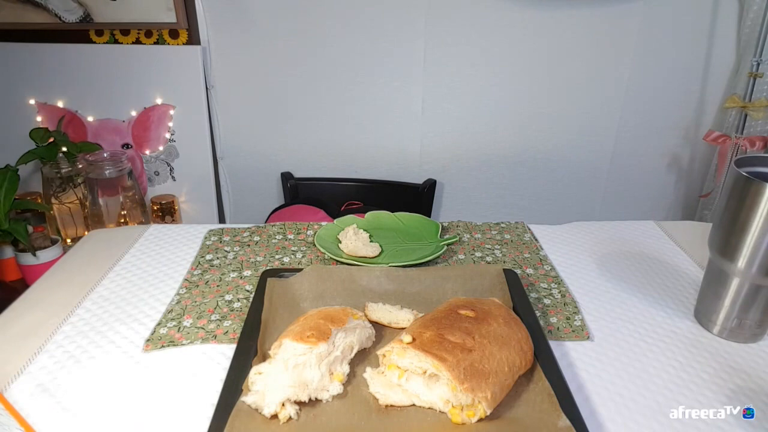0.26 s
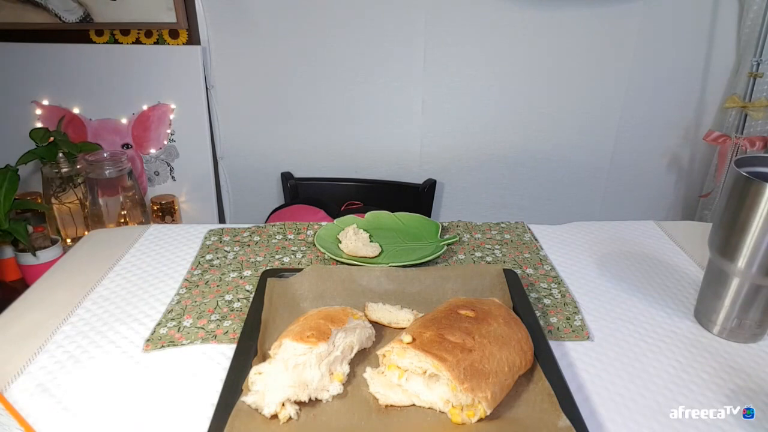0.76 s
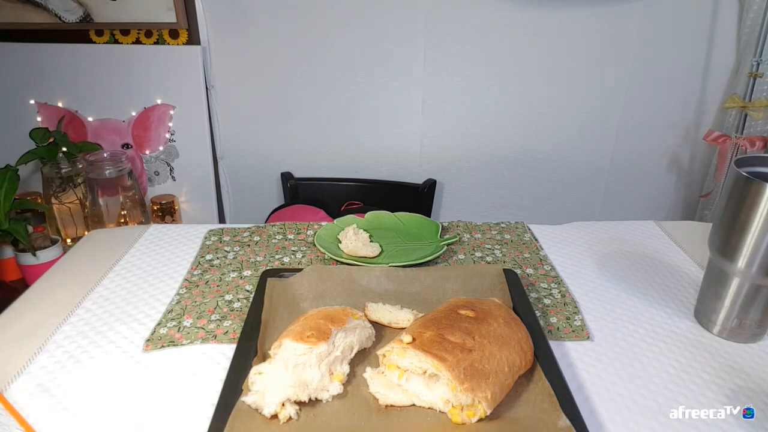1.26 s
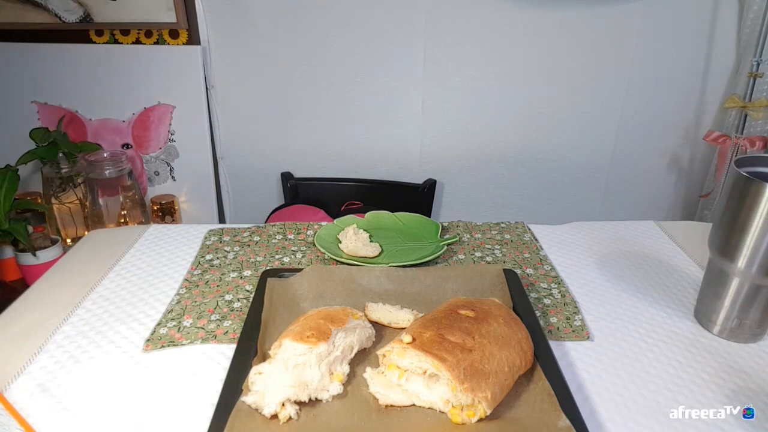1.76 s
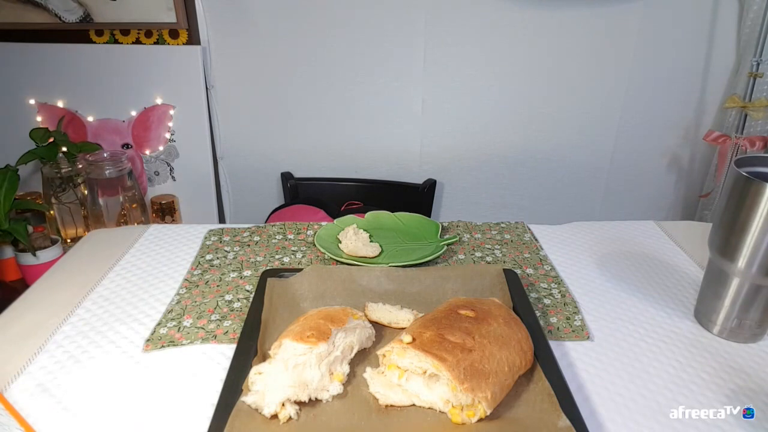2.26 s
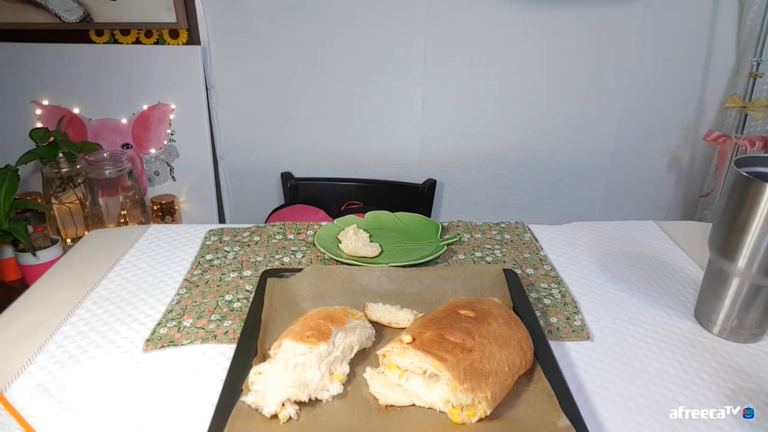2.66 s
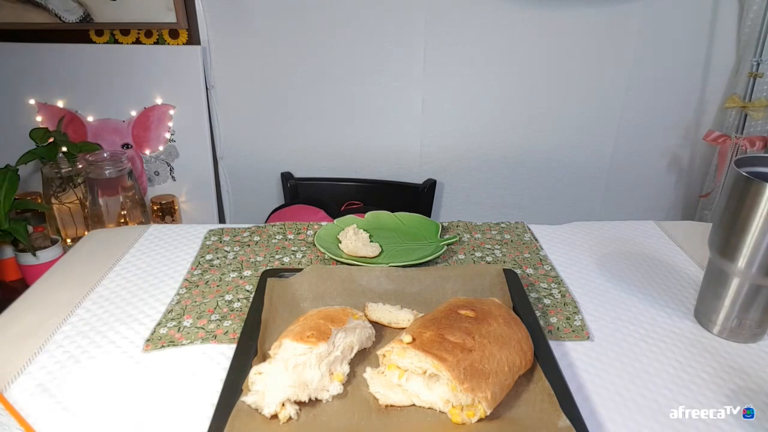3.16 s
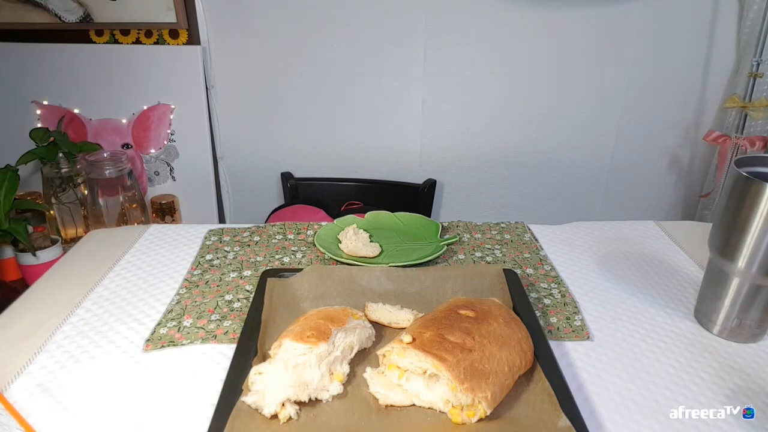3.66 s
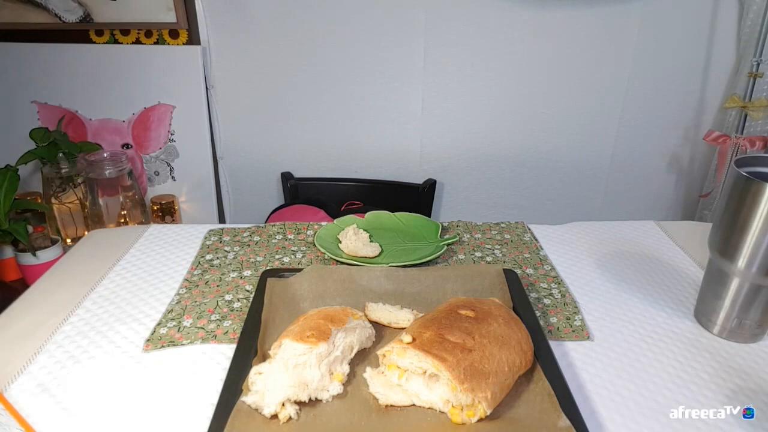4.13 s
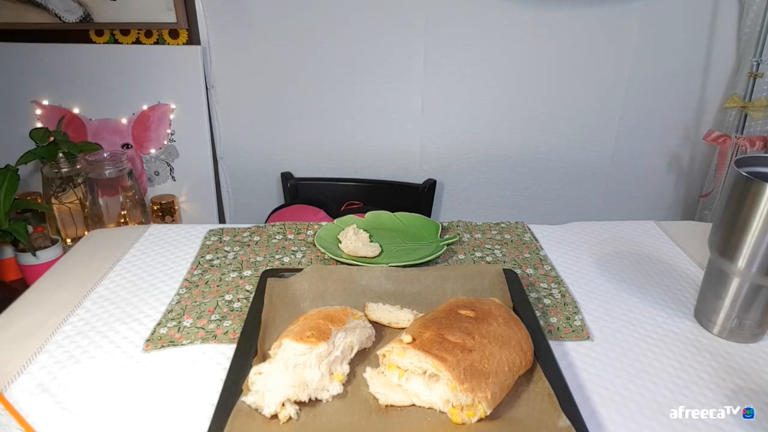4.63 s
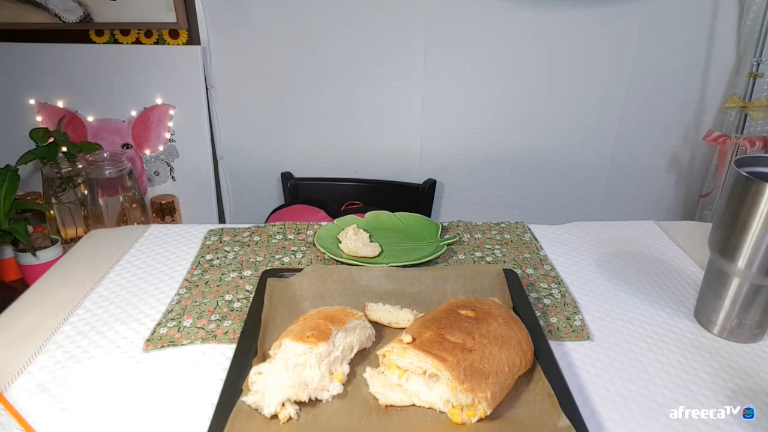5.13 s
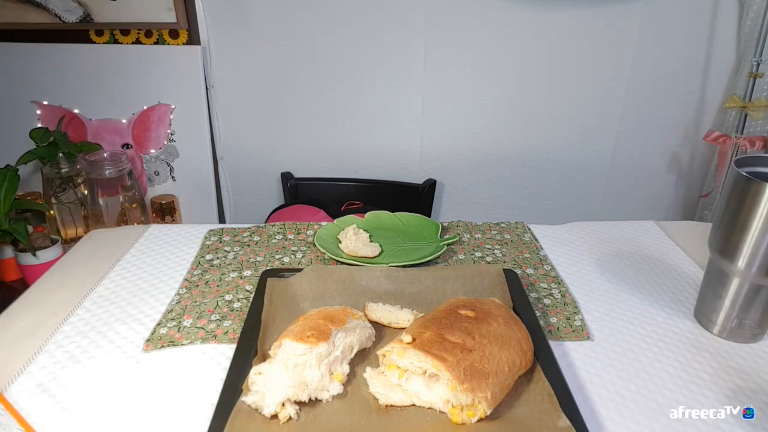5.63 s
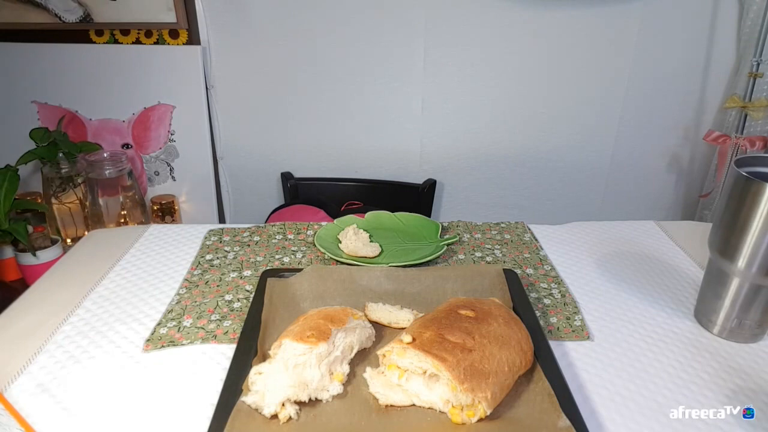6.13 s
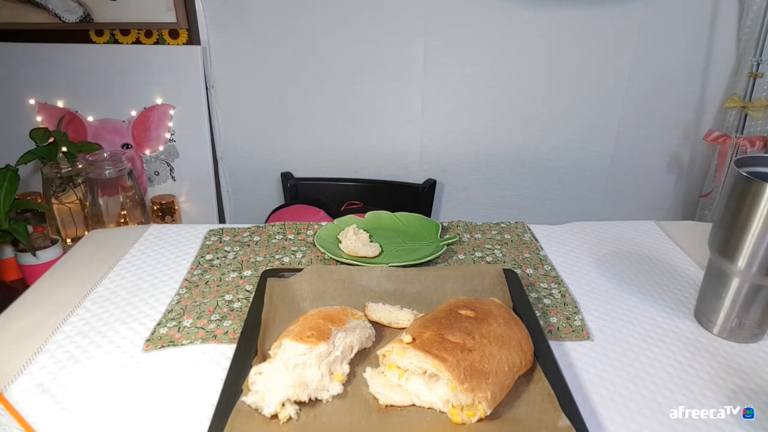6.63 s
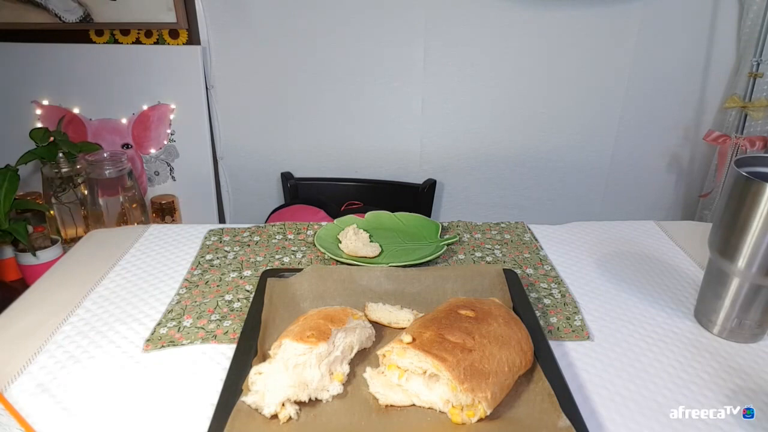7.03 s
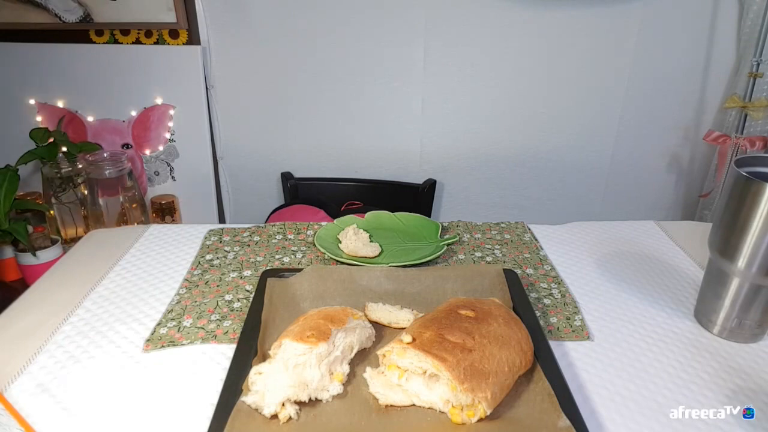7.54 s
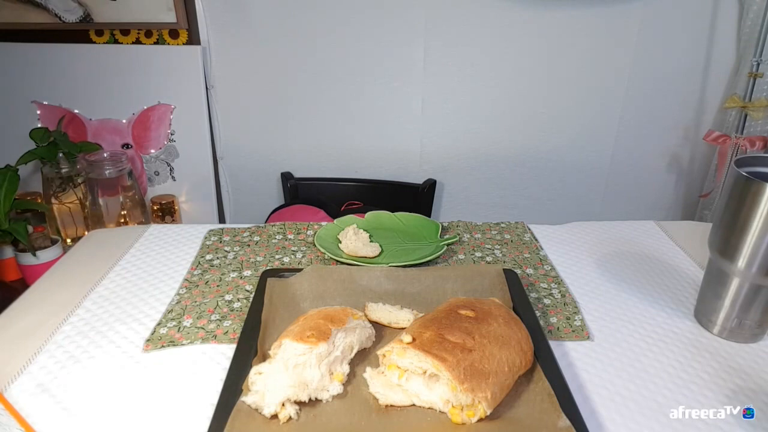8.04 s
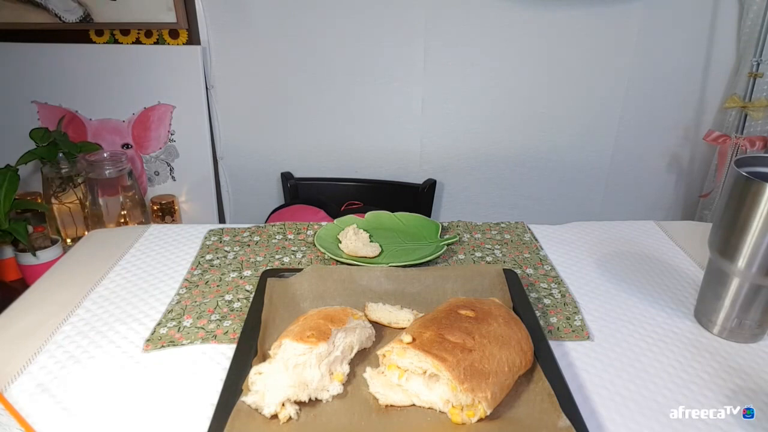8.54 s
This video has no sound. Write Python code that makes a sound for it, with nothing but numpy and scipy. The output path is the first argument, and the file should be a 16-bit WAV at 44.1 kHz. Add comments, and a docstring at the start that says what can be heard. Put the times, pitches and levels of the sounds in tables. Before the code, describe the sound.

In a small hard-walled kitchen, someone out of sight searches a refrigerator a few metres from the microphone. Containers knock and thump on plastic shelves in irregular clusters, each with a short hollow boom and room echo. Glass jars clink brightly around three, four and eight seconds. Quiet room air and a very faint electrical hum fill the gaps. Nobody speaks.

```python
"""Containers knock on the plastic shelves of a refrigerator being searched in a small, hard-walled kitchen.
Each knock is noise shaped by shelf, container and room resonances, and makes the cabinet's air boom.
Glass jars clink: decaying sine modes with a bright, brief splash of shaped noise.
The search is a few metres away, so nearly all of it arrives by way of the walls.
Filtered noise makes the steady room air beneath, and sine tones a faint mains hum."""
import sys
import numpy as np
from scipy import signal
from scipy.fft import rfft, irfft, next_fast_len
from scipy.io import wavfile
from scipy.ndimage import uniform_filter1d, map_coordinates

SR = 44100
rng = np.random.default_rng(int(sys.argv[2]) if len(sys.argv) > 2 else 0)


def store_pcm(level_fs):
    """Save levels as 16-bit WAV."""
    pcm = np.round(np.clip(level_fs, -1, 1) * 32767).astype(np.int16)
    wavfile.write(sys.argv[1], SR, np.atleast_2d(pcm).T)


N = 387635  # length [samples]


def amp(db):
    """Level law: decibels to amplitude gain."""
    return 10 ** (np.asarray(db) / 20)


def unit(x):
    """Power normalisation: x scaled to rms 1."""
    return x / np.sqrt(np.mean(x ** 2) + 1e-20)


def along(points, hz):
    """Logarithmic interpolation: (frequency, value) points read on a log frequency axis."""
    f, v = np.transpose(points)
    return np.interp(np.log(hz + 1), np.log(f + 1), v)


def filtered(x, response):
    """Linear filtering: the spectrum of x times a response of frequency."""
    m = next_fast_len(len(x) + SR // 2)
    hz = np.fft.rfftfreq(m, 1 / SR)
    return irfft(rfft(x, m) * response(hz), m)[:len(x)]


def coloured(x, db_at):
    """Minimum-phase filtering: folding the cepstrum makes the gain db_at(Hz) in dB causal."""
    m = 2 * len(x)
    log_gain = np.log(amp(db_at(np.fft.rfftfreq(m, 1 / SR))))
    cepstrum = irfft(log_gain)
    cepstrum[1:m // 2] *= 2
    cepstrum[m // 2 + 1:] = 0
    return irfft(rfft(x, m) * np.exp(rfft(cepstrum)))[:len(x)]


def add(track, s, sound):
    """Superposition: mix a sound into the track at time s."""
    start = max(round(s * SR), 0)
    track[start:start + len(sound)] += sound[:len(track) - start]


def bump(hz, centre, octaves):
    """Broad resonance: a bell of height 1 on a log frequency axis."""
    return np.exp(-np.log2((hz + 1) / centre) ** 2 / (2 * octaves ** 2))


def resonance(hz, centre, width):
    """Damped resonance: a Lorentzian peak of height 1, width in Hz."""
    return 1 / (1 + (2 * (hz - centre) / width) ** 2)


def wobble(t, rate):
    """Random modulation: a smooth curve over the times t, with rate knots a second."""
    knots = rng.standard_normal(len(t) // 100)
    return map_coordinates(knots, [t * rate])


def own_modes(hz, height_db=5, width_hz=32, low_hz=400, high_hz=9000, count=60):
    """Modal scatter: gain in dB of narrow modes that one container adds, drawn anew for each."""
    place, strength = rng.random((count, 2)).T[:, :, None]
    centres = low_hz * (high_hz / low_hz) ** (place ** 0.8)  # modes crowd toward the treble
    widths = width_hz * np.sqrt(centres / 1000)  # and are damped more there
    grid = np.arange(0, SR / 2, 10)
    peaks = np.sum(2 * strength * height_db * resonance(grid, centres, widths), axis=0)
    peaks = 2 * height_db * np.tanh(peaks / (2 * height_db))  # neighbouring modes do not pile up
    return np.interp(hz, grid, peaks - uniform_filter1d(peaks, size=50))


# decay of the room's reverberation: (frequency [Hz], t60 [s])
REVERBERATION = [(100, 0.72), (300, 0.3), (1000, .42), (3000, 0.42), (9000, 0.38)]


def kitchen(rise, early_db, db_at, early_t60=0.29, rise_hz=5000, size=300):
    """Reverberation: one second of a blow whose reflections build up, then die, with spectrum db_at(Hz)."""
    hz, s, z = signal.stft(rng.standard_normal(SR), SR, nperseg=256)
    late = amp(-60 * s / along(REVERBERATION, hz)[:, None])
    early = amp(early_db - 60 * s / early_t60)
    build = 1 - np.exp(-s * (1 + hz[:, None] / rise_hz) / rise)  # the treble arrives first
    tail = signal.istft(z * (late + early) * build, SR, nperseg=256)[1][:SR]
    # the room has fine ripples but no broad colour of its own
    power = np.abs(uniform_filter1d(np.abs(rfft(tail, 2 * SR)) ** 2, size=size)) + 1e-12
    return coloured(tail, lambda hz: db_at(hz) - 10 * np.log10(power))


# resonances of the shelves and liner: (frequency [Hz], width [Hz], height above the rest [dB])
SHELF_MODES = [(138.2, 14, 0), (199.5, 36, 5), (231.3, 6.7, 3), (393, 59, 3.5), (478.5, 28.5, 4.5),
               (598, 19, 2.5), (613.4, 23, 4), (746.4, 35, 8), (923, 10, 6.5), (1091, 21, 3),
               (1176, 28, 4.5), (1250, 11, 3.5), (1963, 48, 3.5), (2464, 180, 1.5), (3150, 120, 2.5)]
# spectrum of a knock: (frequency [Hz], density [dB per Hz])
BLOW_SPECTRUM = [(30, -41.5), (70, -1), (100, -5.5), (130, 5.5), (200, 1), (310, 1), (480, -1), (1000, -3),
                 (1600, -7.5), (2600, -10.5), (4000, -17.5), (6000, -26.5), (9500, -32)]
THUD_HZ, CLICK_HZ = 315, 2000  # weight acts below the first, hardness above the second
HOLLOW_OCTAVES = 0.39  # width of a container's own resonance
# heavy knocks shake loose plastic: lower edge [Hz]; dB per dB of weight
RATTLE_HZ, RATTLE_PER_WEIGHT = 6500, 0.55


def below(hz, edge_hz):
    """Low-pass weighting: near 1 under the edge, falling toward 0 over it."""
    return 1 / (1 + np.square(hz / edge_hz) ** 2)


def knock_colour(hz, weight_db, hardness_db, hollow_hz, hollow_db):
    """Impact spectrum in dB: weight feeds bass and fine rattle, hardness the treble; containers ring hollow."""
    shelf = sum(db * resonance(hz, centre, width) for centre, width, db in SHELF_MODES)
    thud = weight_db * below(hz, THUD_HZ)
    rattle = RATTLE_PER_WEIGHT * weight_db * (1 - below(hz, RATTLE_HZ))
    click = hardness_db * (1 - below(hz, CLICK_HZ))
    hollow = hollow_db * bump(hz, hollow_hz, HOLLOW_OCTAVES)
    return along(BLOW_SPECTRUM, hz) + shelf + thud + rattle + click + hollow


CABINET_HZ, CABINET_T60 = 147.4, 0.35  # lowest air mode of the cabinet [Hz], its decay [s]
BOOM_DB, BOOM_RISE_S = -7.5, 0.0096  # relative to a knock's level plus its weight; rise [s]


def cabinet_boom(t):
    """Cavity resonance: the cabinet's lowest air mode swings up and dies away, its pitch slightly varied."""
    hz = CABINET_HZ * (1 + rng.normal(0, 0.0081))
    swing = np.sin(2 * np.pi * hz * t) * (1 - np.exp(-t / BOOM_RISE_S))
    return amp(BOOM_DB - 60 * t / CABINET_T60) * swing


# containers meeting shelves and door: (time [s], level [dB], weight [dB], hardness [dB],
# hollow pitch [Hz], hollow height [dB], rise [s])
CONTAINER_KNOCKS = [(0, -38, 1.5, 4.5, 1040, 6.5, 0.00088), (.705, -42.5, 8.5, -4.5, 270, 3, 0.0086),
                    (0.896, -26.5, 6.5, -0.5, 990, 5, 0.012), (.96, -38.5, 5, 7.5, 480, 8, .006),
                    (1.058, -27, 1.5, 1.5, 1110, 5, 0.0086), (1.425, -35.5, 9.5, -4, 930, 4.5, 0.022),
                    (1.471, -34, 3.5, -4.5, 720, 2.5, 0.0081), (1.596, -52, 17, -5, 710, 9.5, 0.0054),
                    (2.804, -31.5, -7.5, -1, 670, 4.5, 0.0095),
                    (2.843, -30.5, -7.5, 0.5, 1808, 2.5, 0.0083), (3.025, -32, -6, 2, 1180, 7.5, 0.0096),
                    (3.142, -45.5, 10.5, 1, 1900, 7, 0.0042), (3.255, -45, 12.5, 3.5, 777, 14, 0.0093),
                    (3.277, -32.5, -4, 2, 1470, 4.5, 0.0095), (3.454, -41, 1.5, -10, 506, 3, 0.014),
                    (3.496, -48.5, 5, -4, 790, 7.5, 0.0033), (3.937, -51, 10, -3.5, 577, 7.5, 0.014),
                    (4.101, -58.5, -13, 9, 1640, 5.5, 0.0083), (4.138, -39.5, -2, 4, 1460, 14, 0.035),
                    (4.234, -40, -4, -4, 1310, 7.5, 0.0068), (5.03, -49, 11.5, 1, 488, 8.5, 0.0044),
                    (5.087, -46, 8, -3.5, 1150, 7.5, 0.0036), (5.177, -41, 11.5, -8, 754, 2.5, 0.0051),
                    (5.286, -29, 6.5, 3, 790, 4.5, 0.0096), (5.478, -40, 11.5, -3.5, 268, 1.5, 0.011),
                    (5.495, -32.5, 10, -8.5, 700, 3, 0.0019), (5.625, -49, 6.5, -1, 267, 7, 0.011),
                    (5.656, -40.5, 10.5, -7, 290, 8, 0.0053), (5.699, -32.5, 1, -5.5, 1850, 2, 0.009),
                    (5.928, -54.5, 12, -6, 726, 13, 0.002), (5.948, -55, -2, -14, 740, -4, 0.0024),
                    (6.123, -25.5, 6, 1, 470, 8.5, 0.0083), (6.357, -35, 5.5, -3.5, 640, 6.5, 0.012),
                    (7.169, -49, 11, -2, 720, 10, .008), (7.199, -24.5, -3, 3.5, 1600, 3.5, 0.014),
                    (7.441, -61, 18, -1, 377, 5.5, 0.034), (7.805, -32.5, -6, 2.5, 1310, 7.5, 0.0083),
                    (7.903, -34.5, -0.5, 4.5, 1170, 10.5, 0.013),
                    (7.976, -30.5, -6, 2.5, 1700, 4.5, 0.0036), (8.06, -31, -4, 0.5, 740, 2, 0.0026),
                    (8.163, -44, 1, 6, 2630, 0.5, 0.0042), (8.447, -67, 10.5, 14, 1400, 11, 0.0097)]
EARLY_DB = 2  # first reflections over the room's tail


def containers(knock_gain_db=37.0):
    """Impact excitation: each knock drives shelves and room; a heavier one swings the cabinet's air more."""
    out, t = np.zeros(N), np.arange(SR) / SR
    for s, db, weight_db, hardness_db, hollow_hz, hollow_db, rise in CONTAINER_KNOCKS:
        def colour(hz):
            return knock_colour(hz, weight_db, hardness_db, hollow_hz, hollow_db) + own_modes(hz)
        add(out, s, amp(db + knock_gain_db) * kitchen(rise, EARLY_DB, colour))
        add(out, s, amp(db + weight_db) * cabinet_boom(t))
    return out


# spectrum of the room air, scaled as a whole: (frequency [Hz], relative density [dB per Hz])
AIR_SPECTRUM = [(12, -38), (20, -10.5), (22, -10), (59, -6), (111, -7), (155, -10.5), (191, -9.5),
                (386, -16), (569, -20), (615, -19.5), (665, -19), (777, -22), (7240, -42), (9890, -44),
                (12900, -89.5), (21800, -120)]
AIR_DB = -65  # rms


def room_air():
    """Stationary noise: random pressure filtered to the room's spectrum."""
    noise = filtered(rng.standard_normal(N), lambda hz: amp(along(AIR_SPECTRUM, hz)))
    return amp(AIR_DB) * unit(noise)


# tones of the mains hum: (frequency [Hz], level [dB rms])
HUM_TONES = [(59.6, -73), (188.4, -78)]


def mains_hum():
    """Periodic excitation: steady electrical hum as a sum of sines in random phase."""
    t = np.arange(N) / SR
    hum = np.zeros(N)
    for hz, db in HUM_TONES:
        hum += amp(db) * np.sqrt(2) * np.sin(2 * np.pi * (hz * t + rng.random()))
    return hum


# wall modes of the jars, one entry per mode in each table: (frequency [Hz])
JAR_HZ = [3670, 3722, 3779, 3870, 6597, 6720, 6869, 7110, 7212]
# (level before hardness and random spread [dB])
JAR_DB = [1, -14.5, -29.5, -24, -17, -36, -3, -4, -4]
# (t60 [s])
JAR_T60 = [0.38, 0.55, 0.51, .15, 0.35, 0.25, 0.16, 0.29, 0.2]
RING_ATTACK_S = 0.012  # a jar's ring builds up in the room
FLUTTER_DB, FLUTTER_PER_S = 2.5, 35  # reflections make the ring flutter: depth; changes a second


def glass_ring(t, hardness_db, upper_hz, detune=0.00201):
    """Modal superposition: two clusters of close, decaying wall modes; hardness brings out the upper one."""
    hz, level_db, t60 = np.array([JAR_HZ, JAR_DB, JAR_T60])[:, :, None]
    sizes = amp(level_db + hardness_db * (hz > upper_hz) + rng.standard_normal(hz.shape))
    pitches = hz * (1 + detune * rng.standard_normal(hz.shape))  # no two jars are quite alike
    waves = sizes * np.sin(2 * np.pi * (pitches * t + rng.random(hz.shape)))
    ring = np.sum(waves * amp(-60 * t / t60), axis=0)
    attack = 1 - np.exp(-t / RING_ATTACK_S)
    return ring * attack * amp(FLUTTER_DB * wobble(t, FLUTTER_PER_S))


# the brief, broad ring of glass still touching glass: (frequency [Hz], density [dB per Hz])
SPLASH_SPECTRUM = [(1500, -21.5), (3400, -11), (3700, 20), (4200, 0.5), (4650, 1), (5000, -28), (6350, -21),
                   (6600, 17), (7200, -8), (7550, -16), (9500, -45)]
SPLASH_DB, SPLASH_GROWS = 32.5, 1.5  # gain at hardness 0; dB more for each dB of hardness


def glass_splash(hardness_db, upper_hz):
    """Contact excitation: touching glass sounds a broad band in the room, brighter for a harder touch."""
    def colour(hz):
        return along(SPLASH_SPECTRUM, hz) + hardness_db * (hz > upper_hz) + own_modes(hz)
    splash = kitchen(rise=0.004, early_db=0.5, db_at=colour)
    return amp(SPLASH_DB + SPLASH_GROWS * hardness_db) * splash


# jars touching: (time [s], level [dB], hardness [dB])
JAR_CLINKS = [(2.496, -100, 7), (2.871, -46, -1.5), (2.942, -50, -16), (3.126, -45, -2.5),
              (3.162, -46.5, -20), (3.206, -51, -27), (3.268, -34.5, -16.5), (4.140, -39.5, -2.5),
              (4.165, -41.5, -3.5), (6.769, -102, 6), (7.872, -53.5, -9), (8.041, -37.5, -3.5),
              (8.171, -47, -4.5)]


def jars(upper_hz=5500):
    """Collision of shells: each clink is a modal ring plus a splash; hardness acts above upper_hz."""
    out, t = np.zeros(N), np.arange(SR) / SR
    for s, db, hardness_db in JAR_CLINKS:
        ring = glass_ring(t, hardness_db, upper_hz)
        add(out, s, amp(db) * (ring + glass_splash(hardness_db, upper_hz)))
    return out


def scene():
    """Superposition: every source summed at one distant microphone."""
    return (containers() + room_air() + mains_hum() + jars())[None]


TOP_HZ = 9950


def record(dry):
    """Band limiting: the recorder keeps nothing above its top frequency."""
    return np.array([filtered(channel, lambda hz: hz < TOP_HZ) for channel in dry])


dry = scene()
out = record(dry)
store_pcm(out)
```